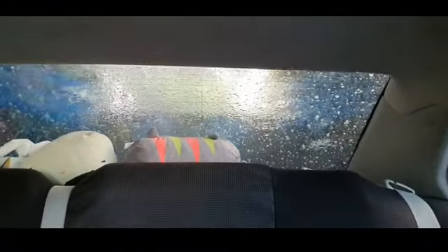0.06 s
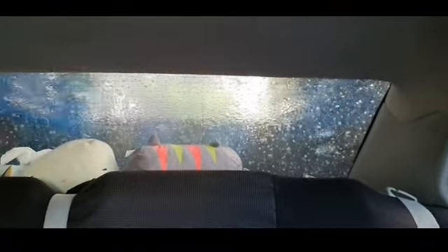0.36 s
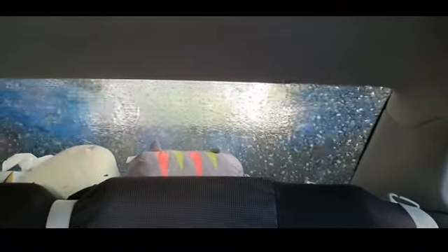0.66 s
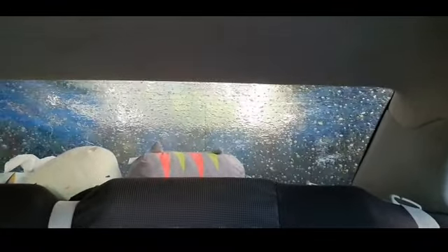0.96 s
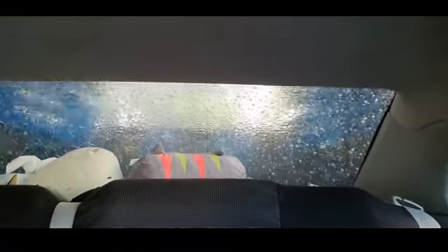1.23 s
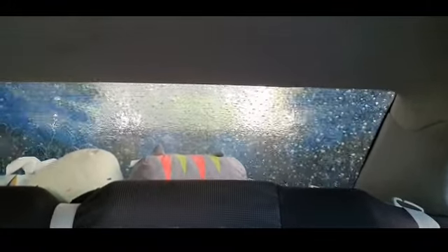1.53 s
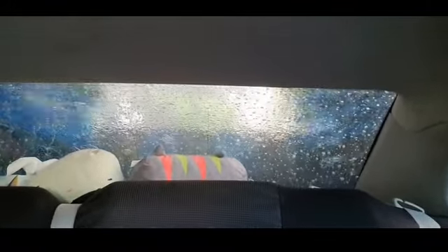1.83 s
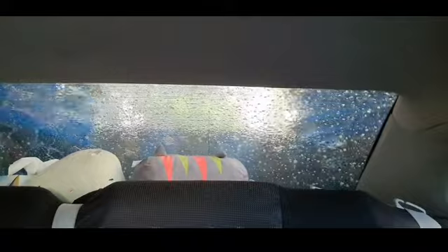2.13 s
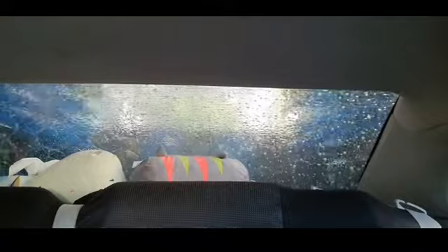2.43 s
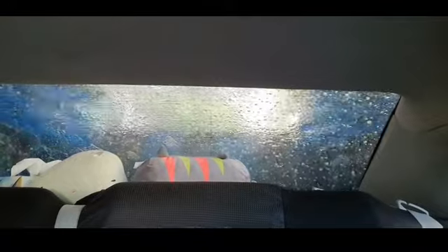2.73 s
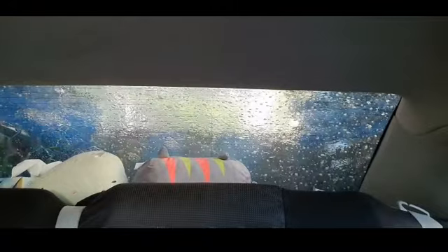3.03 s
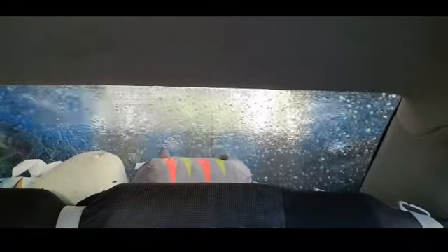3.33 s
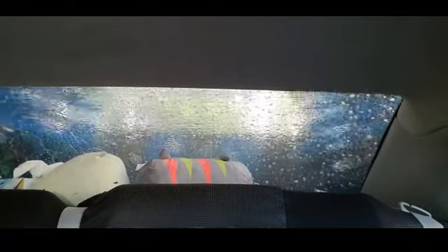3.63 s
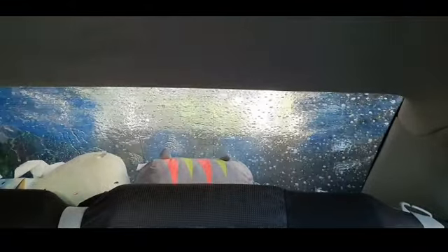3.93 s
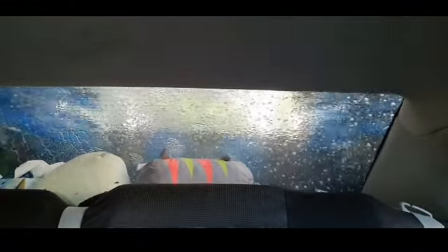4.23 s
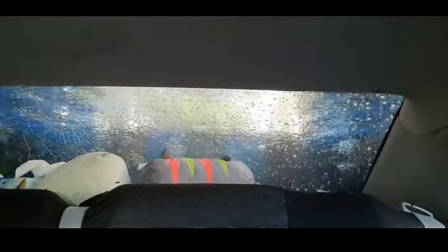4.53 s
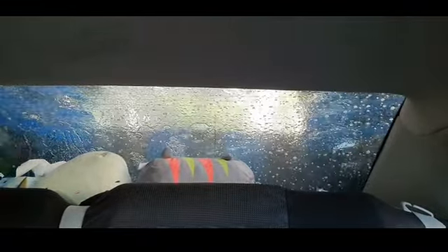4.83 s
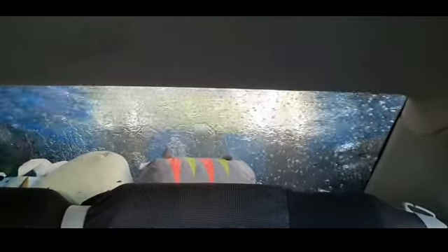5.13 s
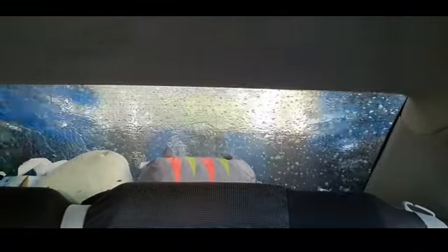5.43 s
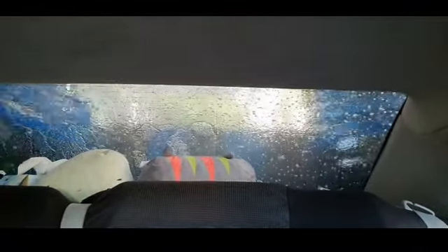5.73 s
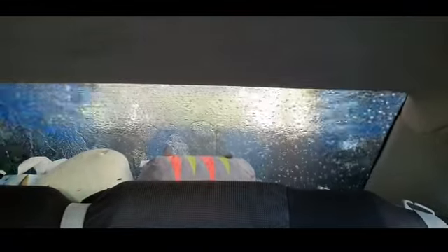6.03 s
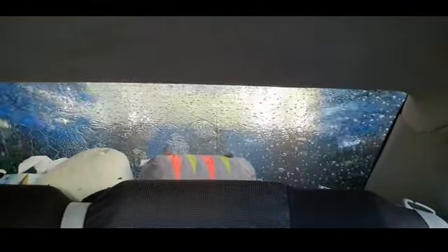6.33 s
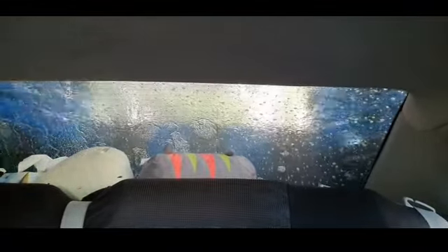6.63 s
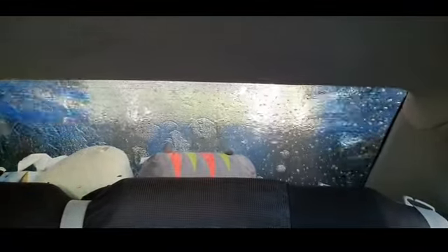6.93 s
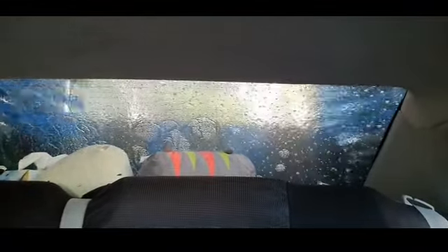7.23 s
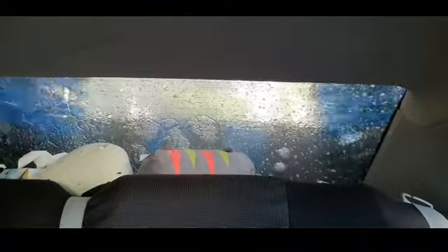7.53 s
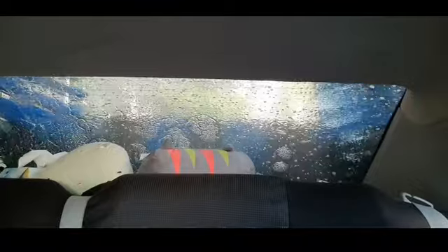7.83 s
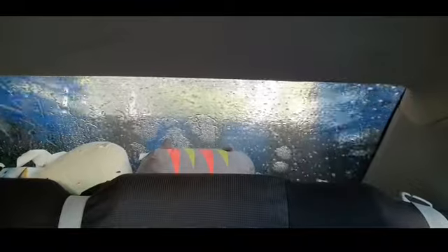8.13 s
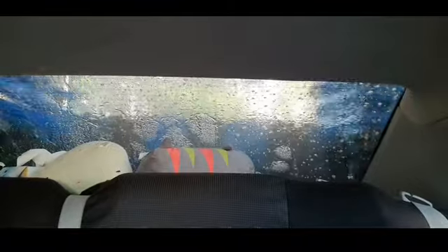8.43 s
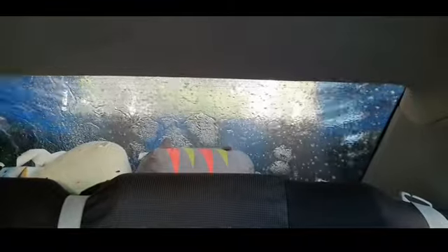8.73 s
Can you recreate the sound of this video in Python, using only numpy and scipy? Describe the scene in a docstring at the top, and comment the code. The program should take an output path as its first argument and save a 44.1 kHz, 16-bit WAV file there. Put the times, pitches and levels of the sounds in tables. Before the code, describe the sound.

From inside a closed car, automatic wash brushes make a continuous, booming rumble with a fast, wet flutter of cloth on the windows. Harder smacks and splashes break through irregularly, along with hollow panel knocks and short rubbing groans at changing pitches. The cabin booms most around the middle, and the rubbing is strongest near the end. A fine spray hiss and a few faint drop ticks sit to the right.

```python
"""Spinning cloth brushes travel along a closed car in an automatic wash, heard from inside.
They force the cabin air, the roof and the door panels into vibration, each swelling as a brush nears.
A rubbed panel drones or sings, heavy strips knock, and a shove of the car makes the cabin boom.
Wet strips slap and swish over the glass many times a second, while spray fizzes and single drops
tick on the window to the right."""
import sys
import numpy as np
from scipy import signal
from scipy.fft import rfft, irfft, next_fast_len
from scipy.io import wavfile
from scipy.ndimage import uniform_filter1d, map_coordinates

SR = 44100
rng = np.random.default_rng(int(sys.argv[2]) if len(sys.argv) > 2 else 0)


def unload_wav(signal):
    """Save mono or channel-first audio to the path in sys.argv[1] as 16-bit WAV at rate SR, clipped to [-1, 1]."""
    wavfile.write(
        sys.argv[1],
        SR,
        np.round(np.clip(np.atleast_2d(signal).T, -1, 1) * 32767).astype(np.int16),
    )


N = 396018

# resonances of cabin and body panels: (frequency [Hz], bandwidth [Hz], lift [dB])
RESONANCES = [(41, 8, 7), (72, 19, 11), (103.6, 10.6, 9), (134.3, 25, 5.5), (197, 28, 6),
              (265.7, 14.7, 5.5), (381.3, 55, 2.5), (480.8, 34, 5), (595.5, 36, 4.5), (707, 63, 7),
              (860, 39, 6.5), (994, 30, 4.5)]
# hardest slaps of wet cloth: (time [s], smack strength [dB], splash strength [dB])
HARD_SLAPS = [(0.219, 2, 3), (0.259, 3, 0), (0.295, 6, 5), (0.416, 5, 5), (0.586, 5, 4), (0.694, 5, -1),
              (0.783, 8, 2), (0.936, -6, 3.5), (1.332, 4, 1), (1.537, 2, 4), (1.577, 4, 2.5),
              (1.867, 3.5, 3), (1.967, 1, 1.5), (2.401, 6, 5), (2.789, 6, 6.5), (2.892, 2, 5),
              (3.111, 4.5, 2), (3.175, 3, 7.5), (3.263, 3, 5.5), (3.436, 2, 7), (3.461, 3, 8),
              (3.487, 6, -4), (3.61, 2, 0), (4.018, 3.5, 4), (4.043, 4.5, -2), (4.096, 6, 6),
              (4.326, 5.5, 4), (4.527, 7.5, 4), (4.559, 2, 1), (4.627, 6, 6.5), (4.853, 4, 6),
              (4.885, 4, 4), (4.922, 5, 6), (5.174, 5, 3.5), (5.421, 4.5, 2), (5.543, 2, 0), (5.584, 3, 3),
              (5.626, 2, 4), (5.876, 6.5, 3), (6.17, 2, -5), (6.345, -1, 2), (6.449, 6, 2), (6.616, 5, 3),
              (7.025, 6, 4), (7.229, 3, 4), (7.33, 5, 3), (7.522, 4, 2), (8.596, 5.5, 0), (8.87, 4, 0),
              (8.936, 2, 4.5)]


def amp(db):
    """Decibels to amplitude ratio."""
    return 10 ** (np.asarray(db) / 20)


def unit(x):
    """Normalisation to rms 1."""
    return x / np.sqrt(np.mean(x ** 2) + 1e-20)


def along(points, hz):
    """Interpolation of (frequency, value) points on a logarithmic frequency axis."""
    f, v = np.transpose(points)
    return np.interp(np.log(hz + 1), np.log(f + 1), v)


def wobble(rate):
    """Smooth random modulation: a spline through rate knots a second."""
    knots = rng.standard_normal(int(N * rate / SR) + 4)
    return map_coordinates(knots, [np.arange(N) * rate / SR])


def filtered(x, response):
    """Linear filtering: the spectrum of x times a frequency response."""
    m = next_fast_len(N + SR // 2)
    return irfft(rfft(x, m) * response(np.fft.rfftfreq(m, 1 / SR)), m)[..., :N]


def noise():
    """Two uncorrelated white noises."""
    return rng.standard_normal((2, N))


def drops(rate, size_db):
    """Shot noise at rms 1: impacts of drops of random size, rate a second."""
    lands = rng.random((2, N)) < rate / SR
    return unit(lands * np.sign(noise()) * amp(size_db * noise()))


def resonance_db(hz):
    """Resonance: each mode of the car lifts a bell-shaped band of frequencies."""
    return sum(db / (1 + (2 * (hz - centre) / width) ** 2) for centre, width, db in RESONANCES)


def in_cabin(pair, spectrum, resonant=False):
    """Coherence in a small enclosure: bass is alike on both sides, treble diffuse. Output at rms 1."""
    # diffuseness: (frequency [Hz], side minus mid [dB])
    diffuseness = [(30, -21), (80, -18.5), (160, -16), (330, -14.5), (470, -10), (630, -5.5), (780, -4.5),
                   (1000, -0.4), (1600, 4), (2100, -0.4), (2700, 2.5), (3400, 0), (14000, 0.5)]
    # balance: (frequency [Hz], left minus right [dB])
    balance = [(60, 0), (130, -2.5), (280, -0.5), (700, -2.5), (1300, 0), (2800, 0.5), (4200, -4.5),
               (6200, -7), (7500, -35), (14000, -21)]
    colour = lambda hz: amp(along(spectrum, hz) + (resonance_db(hz) if resonant else 0))
    turn = lambda hz: np.arctan(amp(along(diffuseness, hz)))
    pan = lambda hz: np.arctan(amp(along(balance, hz)))
    mid, side = filtered(pair, lambda hz: colour(hz) * [np.cos(turn(hz)), np.sin(turn(hz))])
    stereo = np.array([mid + side, mid - side])
    return unit(filtered(stereo, lambda hz: np.array([np.sin(pan(hz)), np.cos(pan(hz))])))


def passing(passes):
    """Inverse-distance law: the gain of sources that travel by at a steady speed."""
    t = np.arange(N) / SR
    return np.sqrt(sum(amp(db) ** 2 / (1 + ((t - s) / half_s) ** 2) for s, db, half_s in passes))


def wandering(x, depth_db):
    """Moving excitation: as the point of contact wanders, each band swells and fades on its own."""
    bands = signal.stft(x, nperseg=1024)[2]
    field = uniform_filter1d(rng.standard_normal(bands.shape[1:]), size=4, axis=0)
    field = uniform_filter1d(field, size=16, axis=1)
    return signal.istft(bands * amp(depth_db * unit(field)), nperseg=1024)[1][:, :N]


def swishes(times, powers, width_s, slide=1.47):
    """Incoherent addition: powers sum for strips that land quickly and slide off more slowly."""
    power = np.zeros(N)
    for s, peak in zip(times, powers):
        i = np.arange(max(0, int((s - 8 * width_s) * SR)), min(N, int((s + 8 * width_s) * SR)))
        t = i / SR - s
        power[i] += peak * np.exp(-(t / np.where(t < 0, width_s / slide, width_s * slide)) ** 2 / 2)
    return power


def flapping(rate, scatter, size_db, uneven_db, width_s):
    """Quasi-periodic forcing: the power, of mean 1, of light strips, every other one harder."""
    shift, size = rng.standard_normal((int(N / SR * rate) + 2, 2)).T
    k = np.arange(len(shift))
    strength_db = size_db * size + uneven_db * (-1) ** k
    power = swishes((k + scatter * shift) / rate, amp(strength_db) ** 2, width_s)
    return power / power.mean()


def slapping(width_s):
    """Impact power of the hard slaps, for smack and for splash; 0 dB or less adds nothing."""
    times, smack_db, splash_db = np.transpose(HARD_SLAPS)
    return [swishes(times, np.maximum(amp(db) ** 2 - 1, 0), width_s, slide=1.5)
            for db in (smack_db, splash_db)]


def boom():
    """Cavity resonance: a passing brush shakes the enclosed air."""
    # cabin air: (frequency [Hz], relative level [dB])
    spectrum = [(12, -48), (22, -31), (32, -10), (45, -10), (65, -2.5), (105, -1), (135, -4.5), (200, -18),
                (400, -39), (900, -90)]
    # nearest approach: (time [s], level [dB], time to half power [s])
    brush_pass = [(4.4, -23.5, 4.7)]
    return passing(brush_pass) * in_cabin(noise(), spectrum, resonant=True)


def roof():
    """Forced vibration of a plate: a brush drums on the broad roof, which sounds low."""
    # roof: (frequency [Hz], relative level [dB])
    spectrum = [(50, -57), (120, -6), (170, 1.5), (230, -2), (300, -1), (370, -5.5), (520, -23.5),
                (1500, -88)]
    # nearest approach: (time [s], level [dB], time to half power [s])
    brush_pass = [(5.4, -22.5, 9.7)]
    return passing(brush_pass) * in_cabin(noise(), spectrum, resonant=True)


def doors(strips):
    """Forced vibration of smaller plates: beaten by the strips, the door panels sound higher."""
    # door panels: (frequency [Hz], relative level [dB])
    spectrum = [(150, -37), (280, -10), (345, -2.5), (430, 0), (530, -2.5), (660, -7), (790, -10),
                (930, -20.5), (1300, -20.5), (2500, -41.5), (6000, -90)]
    # nearest approaches: (time [s], level [dB], time to half power [s])
    brush_passes = [(0.2, -31, 0.7), (2.8, -24.5, 1.58), (7.3, -22, 2.98)]
    beating = wandering(noise(), depth_db=0.65) * np.sqrt(1 + amp(-6) * strips)
    return passing(brush_passes) * in_cabin(beating, spectrum, resonant=True)


def smack(power):
    """Soft impact: wet cloth makes a dull noise on the glass, swelling as a jet sweeps across."""
    # cloth on glass: (frequency [Hz], relative level [dB])
    spectrum = [(200, -35), (600, -8), (1000, -1), (1300, 0), (1650, -3.5), (2100, -6), (2700, -13),
                (4000, -25), (9000, -72)]
    # jet sweeps: (time [s], lift [dB], half length [s])
    surges = [(1.24, 2, 0.042), (4.52, 1.3, 0.046), (5.6, 1.5, 0.09), (7.35, 1, 0.24)]
    t = np.arange(N) / SR
    surge_db = sum(db * np.exp(-((t - s) / half_s) ** 2 / 2) for s, db, half_s in surges)
    rubbing = wandering(noise(), depth_db=0.82) * amp(0.55 * wobble(60))
    return amp(surge_db) * in_cabin(rubbing * np.sqrt(power), spectrum, resonant=True)


def splash(power):
    """Superposed drop impacts: the water from the strips makes a bright, grainy hiss."""
    # water on glass: (frequency [Hz], relative level [dB])
    spectrum = [(800, -27), (2000, -0.5), (2900, -0.5), (3800, 2), (4600, -2), (5600, -8), (6800, -15),
                (8000, -28), (11000, -44), (14000, -50)]
    water = noise() + amp(-6) * drops(rate=1800, size_db=5.5)
    return in_cabin(water * np.sqrt(power) * amp(1.05 * wobble(90)), spectrum)


def spray(strips):
    """Shot noise: fine drops from the passing jets and the brushes fizz on the window."""
    # fine drops: (frequency [Hz], relative level [dB])
    spectrum = [(2000, -7), (5000, -7.5), (7000, 2.5), (8100, -8), (9200, 0.5), (10600, 5.5),
                (11700, -11.5), (13000, -2.5), (14500, -14)]
    # nearest approach: (time [s], level [dB], time to half power [s])
    jet_pass = [(5.2, -53.5, 5.2)]
    mist = noise() + amp(-6) * drops(rate=1400, size_db=3)
    mist *= np.sqrt(1 + amp(-1.5) * strips)
    return passing(jet_pass) * in_cabin(wandering(mist, depth_db=1.5), spectrum)


def rubs(rate, ripple_db, rise):
    """Friction-driven vibration: a rubbed panel drones roughly, its pitch rising as the brush presses."""
    # brush drags: (time [s], level [dB], half length [s], pitch [Hz], waver [Hz])
    drags = [(0.202, -27, 0.2, 360.7, 16), (0.502, -23.5, 0.36, 138.6, 16),
             (1.404, -26.5, 0.25, 105.6, 7.5), (2.053, -30, 0.35, 290, 16.2),
             (3.329, -23.5, 0.17, 104.7, 7.84), (3.85, -27.5, 0.17, 73.1, 5), (4.35, -32, 0.38, 688, 24),
             (4.75, -29, 0.45, 203.4, 14), (5.588, -22.5, 0.06, 192, 7.6), (6.15, -28, 0.28, 266, 12.3),
             (6.7, -29, 0.6, 475.5, 14.2), (6.931, -22, 0.06, 142.5, 8), (7.18, -23.5, 0.14, 164, 12),
             (7.92, -20.5, 0.13, 137.7, 8.06), (8.301, -28.5, 0.4, 164, 14.5), (8.55, -22, 0.36, 141.9, 10),
             (8.7, -30, 0.35, 467.5, 15.6)]
    out, t = np.zeros(N), np.arange(N) / SR
    for s, db, half_s, hz, waver_hz in drags:
        progress = (t - s) / half_s
        pitch = hz * (1 + rise * progress) + waver_hz * wobble(rate)
        drone = unit(np.sin(2 * np.pi * np.cumsum(pitch) / SR) * amp(ripple_db * wobble(rate)))
        out += amp(db) * np.exp(-progress ** 2 / 2) * drone
    return out * amp([[-1], [1]])


def spatter(power):
    """Atomisation by impact: a hard slap flings out bright droplets."""
    # droplets: (frequency [Hz], relative level [dB])
    spectrum = [(1500, -21), (3000, 3.5), (4200, 3), (5600, -5), (7500, -12.5), (9000, -19), (14000, -29)]
    return in_cabin(drops(rate=2700, size_db=4) * np.sqrt(power), spectrum)


def ticks(t60, edge_hz):
    """Brief impacts are broadband: single hard drops click on the glass to the right."""
    # drop impacts: (time [s], level before the high-pass [dB])
    impacts = [(.387, -35), (6.35, -38), (6.411, -39)]
    out, t = np.zeros(N), np.arange(SR // 50) / SR
    for s, db in impacts:
        out[round(s * SR):][:len(t)] += amp(db - 60 * t / t60) * rng.standard_normal(len(t))
    return filtered(out, lambda hz: hz ** 2 / (hz ** 2 + edge_hz ** 2)) * amp([[-18], [0]])


def knocks(t60, attack_s, spread_octaves):
    """Damped free vibration: each heavy strip rings the panel modes near its own centre frequency."""
    # blows on the hollow panels: (time [s], peak level [dB], centre [Hz])
    blows = [(0.575, -18, 400), (0.783, -11, 388), (1.816, -14.5, 420), (1.904, -14.5, 400),
             (2.145, -15, 400), (2.388, -9.5, 443), (2.479, -12, 470), (2.785, -13, 420),
             (3.03, -16.5, 446), (3.328, -11.5, 422), (4.878, -11, 386), (5.383, -11.5, 447),
             (5.874, -10, 470), (6.337, -10, 440), (6.46, -14, 480), (7.235, -9.5, 433), (7.34, -8.5, 380),
             (8.409, -15, 403)]
    out, t = np.zeros(N), np.arange(SR // 4) / SR
    modes = np.array(RESONANCES)[:, 0]
    for (s, db, hz), phases in zip(blows, rng.random((len(blows), len(modes)))):
        weights = np.exp(-(np.log2(modes / hz) / spread_octaves) ** 2 / 2)
        ring = weights @ np.sin(2 * np.pi * (modes[:, None] * t + phases[:, None]))
        ring *= amp(-60 * t / t60) * (1 - np.exp(-t / attack_s))
        out[round(s * SR):][:len(t)] += amp(db) * ring / np.abs(ring).max()
    return out


def shoves(waver_hz):
    """Modal excitation: a shove of the whole car swells one low cabin resonance for a few cycles."""
    # pushes of a brush: (time [s], level [dB], half length [s], resonance [Hz])
    pushes = [(0.97, -17.5, 0.022, 100), (3.176, -24, 0.023, 73), (4.19, -22.5, 0.045, 72),
              (4.2, -22.5, 0.025, 104), (4.312, -21.5, 0.022, 104), (4.417, -21, 0.031, 76.1),
              (4.62, -22, 0.022, 72), (4.752, -18, 0.029, 75), (4.906, -22.5, 0.045, 73.2),
              (5.3, -19, 0.046, 74), (6.223, -25, 0.022, 73), (6.74, -22.5, 0.061, 103),
              (6.97, -24, 0.03, 70), (7.524, -25, 0.045, 77)]
    out, t = np.zeros(N), np.arange(N) / SR
    drift = np.cumsum(waver_hz * wobble(30)) / SR
    for (s, db, half_s, hz), phase in zip(pushes, rng.random(len(pushes))):
        near = np.abs(t - s) < 4 * half_s
        swell = amp(db) * np.exp(-((t[near] - s) / half_s) ** 2 / 2)
        out[near] += swell * np.sqrt(2) * np.sin(2 * np.pi * (hz * t[near] + drift[near] + phase))
    return out * amp([[-0.5], [0.5]])


def scene():
    """Superposition of all sources; the same flapping strips modulate doors, glass and spray."""
    strips = flapping(rate=22.34, scatter=0.29, size_db=1, uneven_db=1, width_s=0.0084)
    body = boom() + roof() + doors(strips) + shoves(waver_hz=6)
    body += knocks(t60=0.091, attack_s=0.005, spread_octaves=0.45)
    body += rubs(rate=40, ripple_db=4, rise=0.015)
    wash_power = amp(-1) + amp(-10) * strips
    smack_power, splash_power = slapping(width_s=0.0039)
    water = amp(-31) * smack(wash_power + smack_power)
    water += amp(-42) * splash(wash_power + amp(-10) * splash_power)
    water += amp(-53) * spatter(splash_power)
    return body + water + spray(strips) + ticks(t60=0.014, edge_hz=7000)


def record(dry):
    """Band limiting: an ideal low-pass filter removes the highest treble."""
    return filtered(dry, lambda hz: hz < 14600)


dry = scene()
out = record(dry)
unload_wav(out)
```